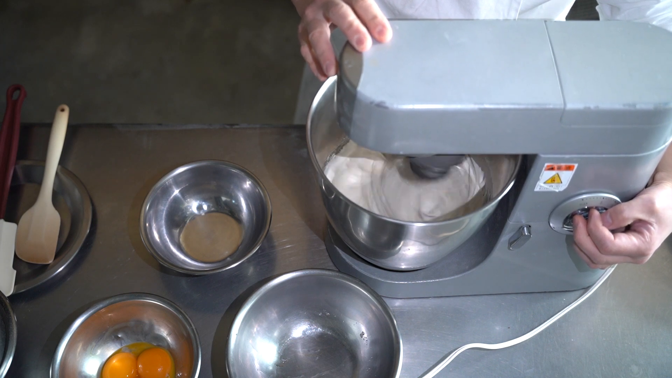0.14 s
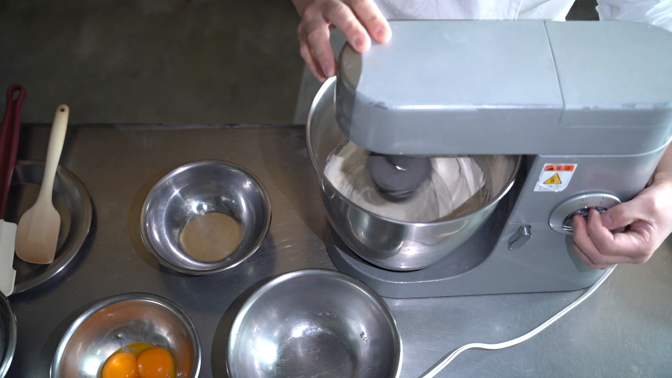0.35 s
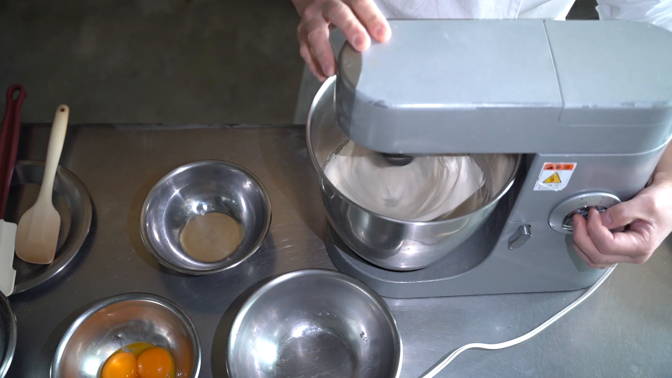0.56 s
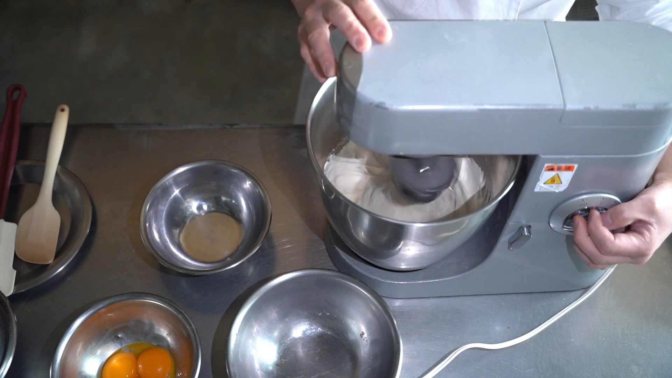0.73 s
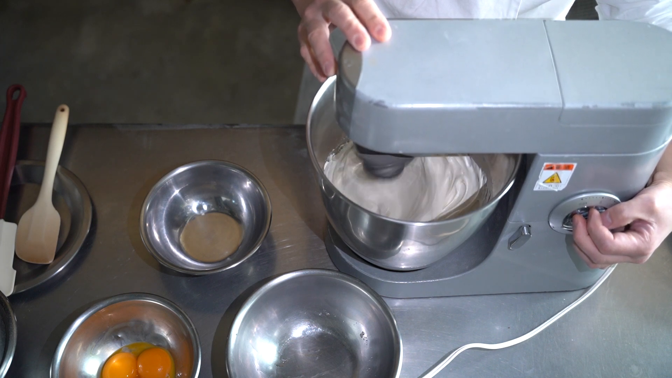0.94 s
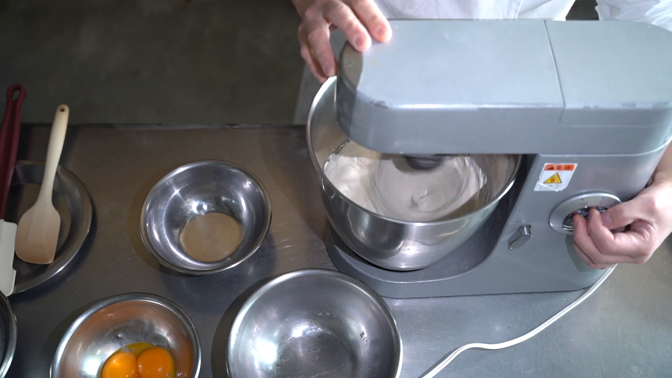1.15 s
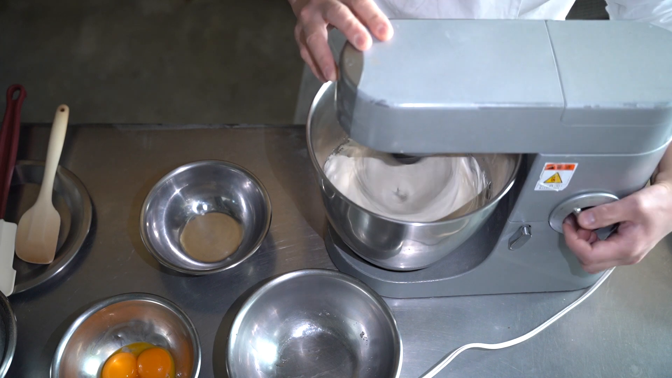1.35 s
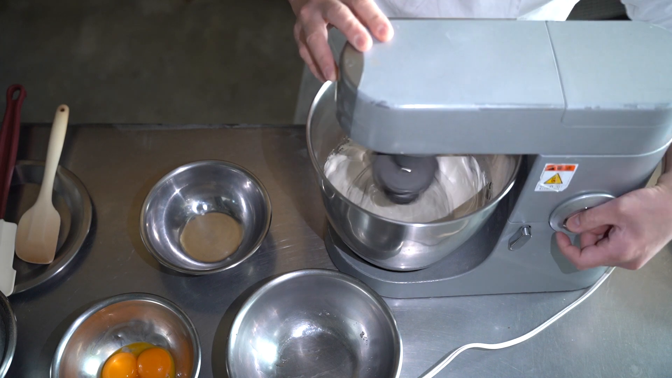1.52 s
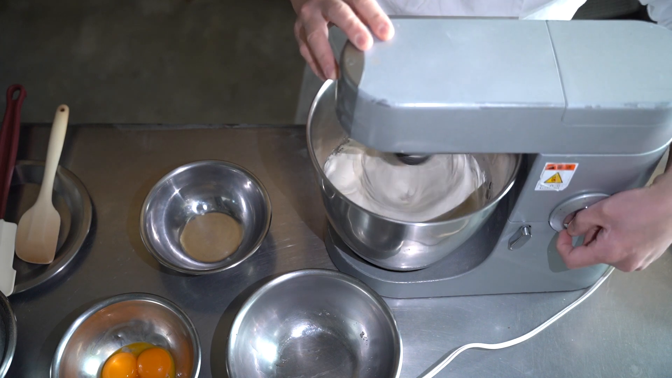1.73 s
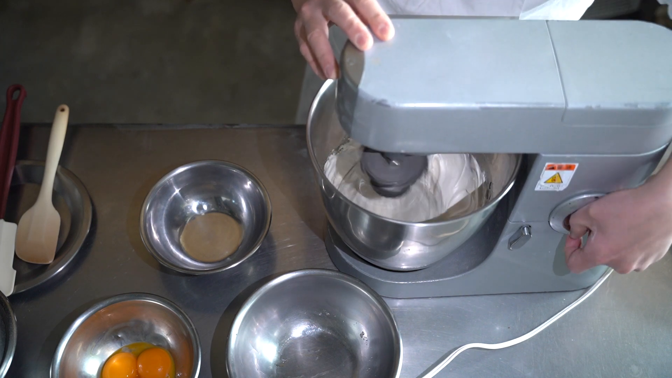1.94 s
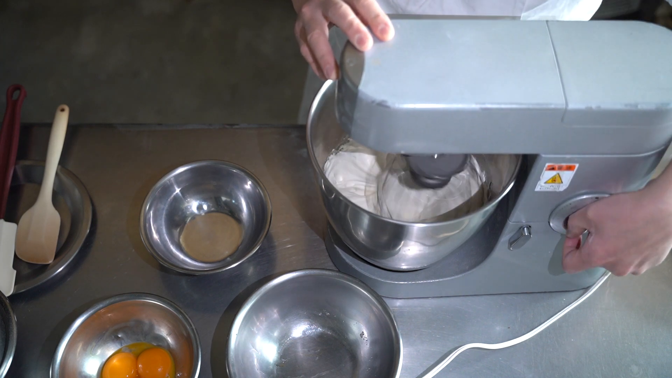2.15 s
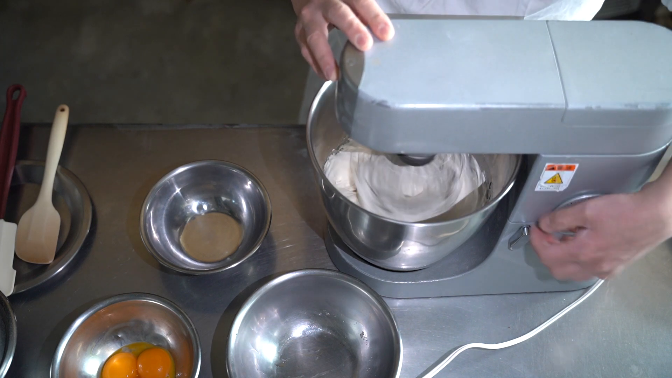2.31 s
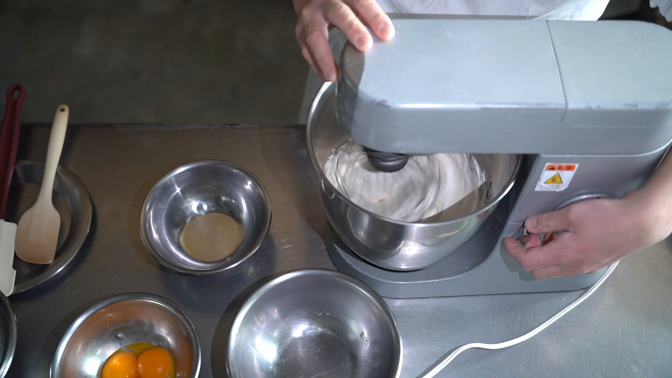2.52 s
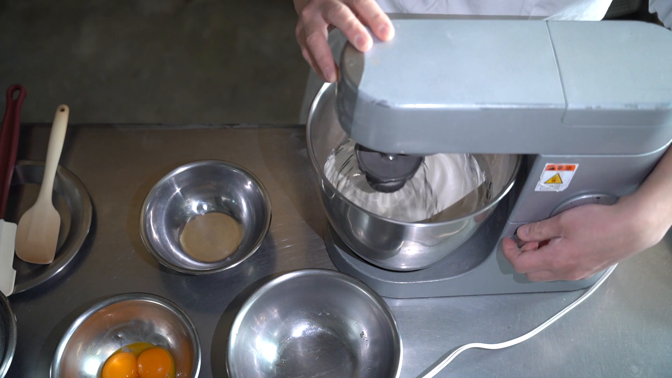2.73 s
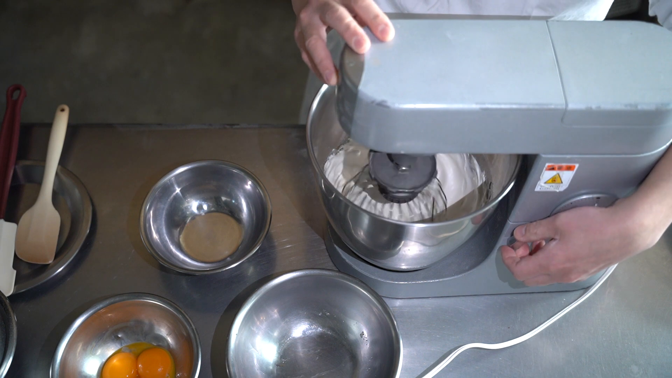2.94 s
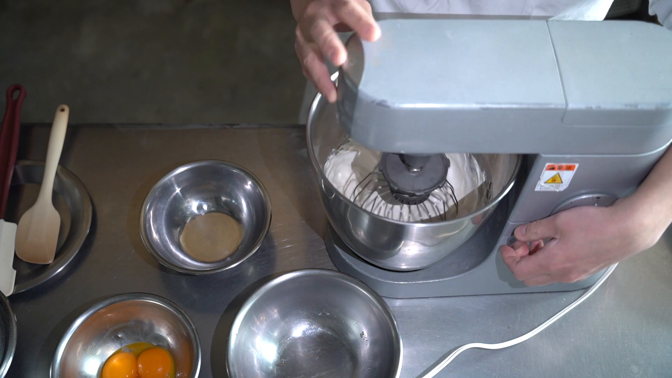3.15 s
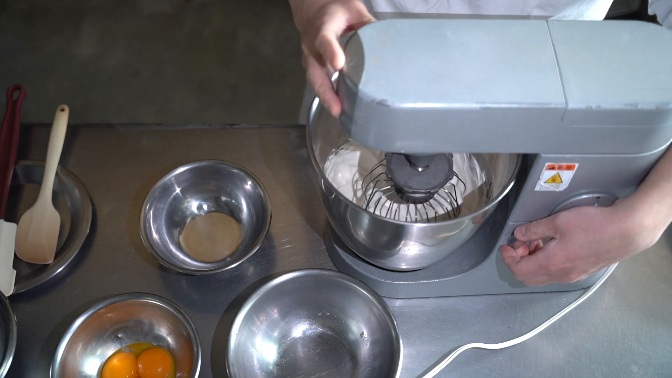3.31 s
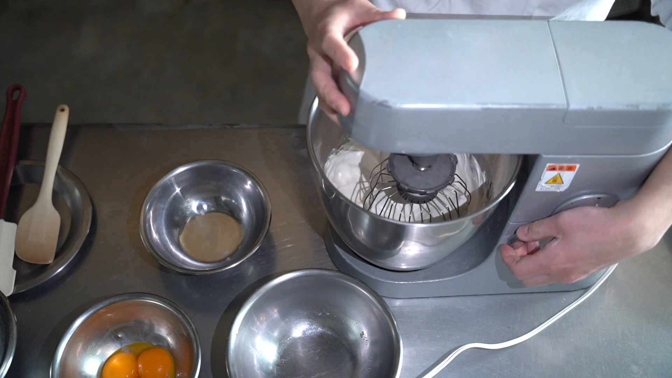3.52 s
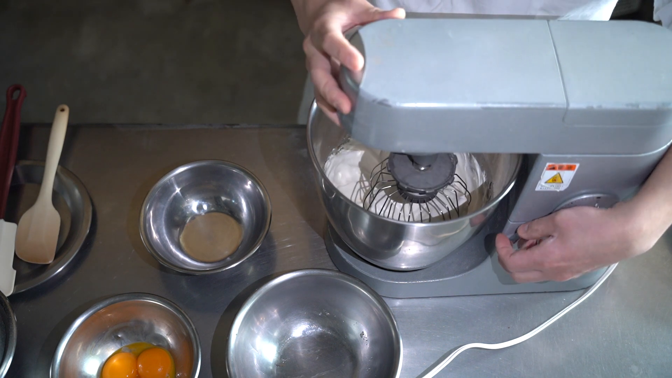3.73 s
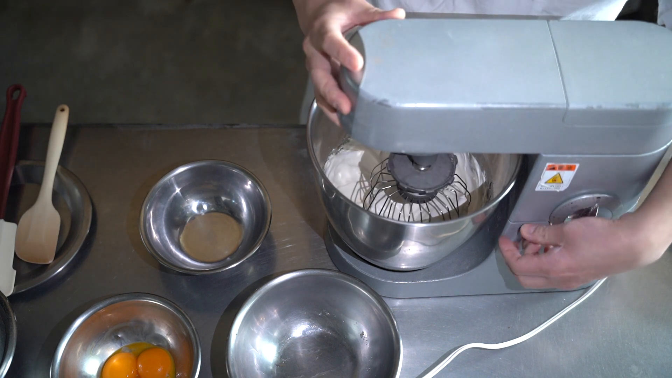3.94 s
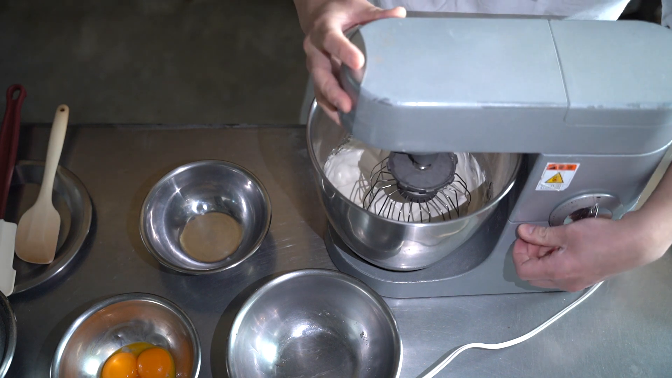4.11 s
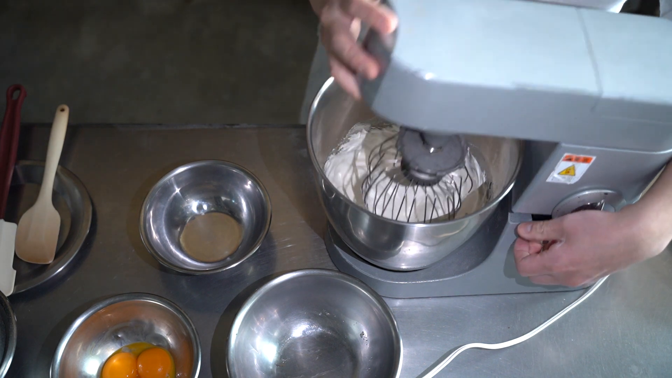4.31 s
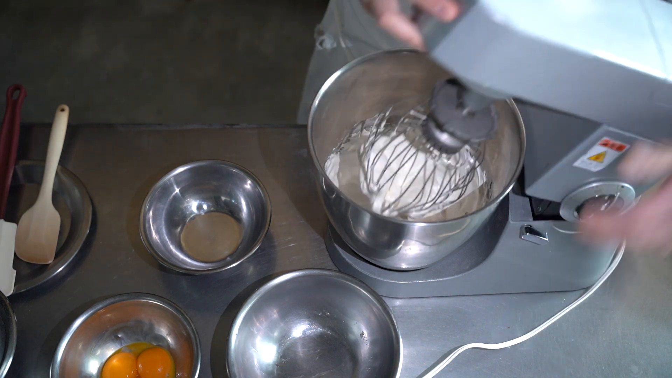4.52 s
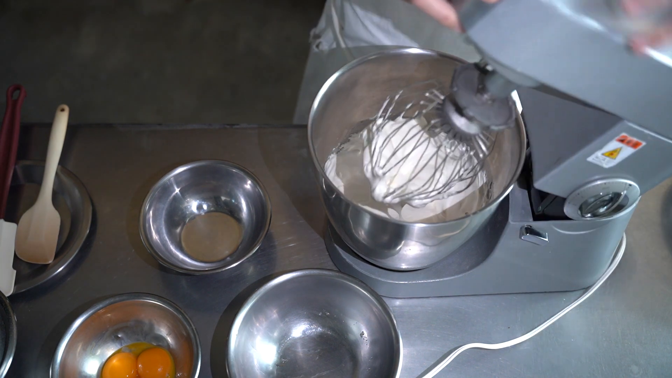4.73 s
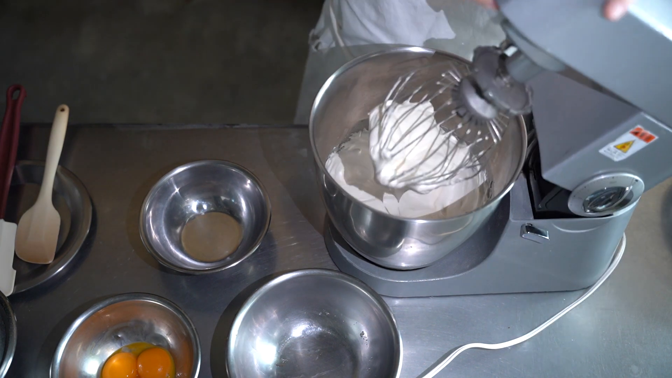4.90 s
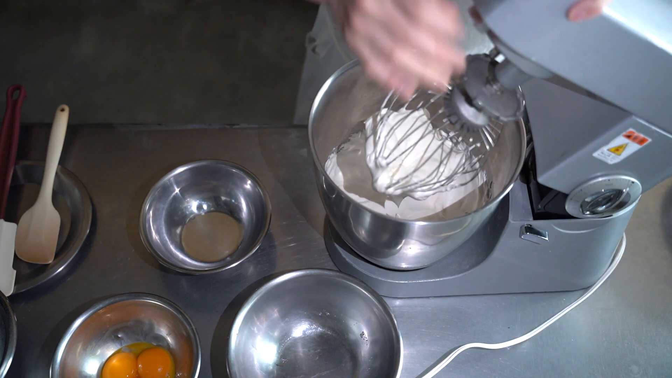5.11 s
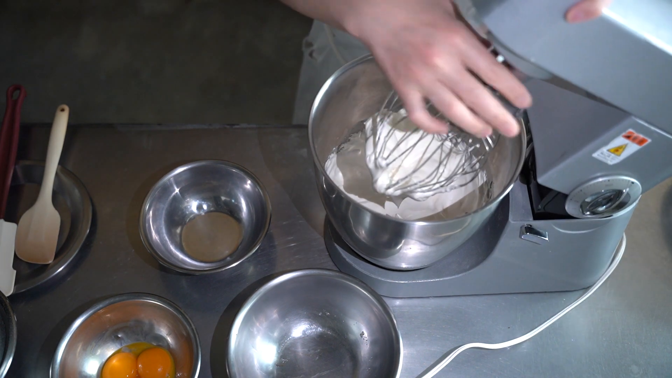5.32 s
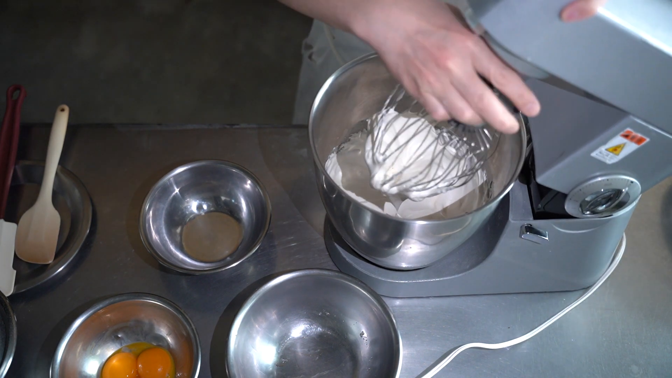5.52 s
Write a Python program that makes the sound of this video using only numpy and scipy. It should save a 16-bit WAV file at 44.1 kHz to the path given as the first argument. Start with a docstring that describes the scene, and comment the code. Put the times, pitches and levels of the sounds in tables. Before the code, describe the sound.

Close by and a little to the right, a stand mixer whips egg whites in a metal bowl with a steady motor whine and a hissing churn. A switch snaps and the motor slows, falling in pitch and fading with a light gear rattle. Then the head lock clacks several times, the hinge scrapes softly and the head clicks into its raised position. A cooling unit hums quietly in the kitchen behind it.

```python
"""A stand mixer whips egg whites in a steel bowl: meshing gears whine, wires churn and flick the foam.
Switched off, it coasts to rest against friction and drag, and the whine glides down through the
housing's fixed resonances. The head lock clacks open, the head swings up with a soft rub and clicks
into its upper stop, each impact ringing its modes. A cooling unit hums behind it in the kitchen."""
import sys
import numpy as np
from scipy import signal
from scipy.fft import rfft, irfft, next_fast_len
from scipy.io import wavfile
from scipy.ndimage import map_coordinates

SR = 44100
rng = np.random.default_rng(int(sys.argv[2]) if len(sys.argv) > 2 else 0)


def bounce(signal):
    """Save signal as a 16-bit WAV file at the path given by the first command-line argument."""
    frames = np.transpose(np.atleast_2d(signal))
    limited = np.clip(frames, -1, 1)
    pcm = np.round(limited * 32767).astype(np.int16)
    wavfile.write(sys.argv[1], SR, pcm)


N = 245195
TIME = np.arange(N) / SR
SWITCH_OFF_S = 1.425
RUN_HZ, CRAWL_HZ = 205.0, 47.7  # shaft rate under power; rate below which whisk and brushes die away

# spectrum of foam droplets striking the bowl: f/Hz, level/dB
SPRAY_SPECTRUM = [(4000, -20), (8000, 6.5), (11000, 1.5), (16000, -0.5)]


def amp(db):
    """Amplitude ratio of a level in decibels."""
    return 10 ** (np.asarray(db) / 20)


def unit(x):
    """Normalisation to rms 1."""
    return x / np.sqrt(np.mean(x ** 2) + 1e-20)


def along(points, hz):
    """Interpolation of (f/Hz, value) points on a logarithmic frequency axis."""
    f, v = np.transpose(points)
    return np.interp(np.log(hz + 1), np.log(f + 1), v)


def wobble(rate):
    """Smooth random modulation: a spline through `rate` Gaussian knots a second."""
    knots = rng.standard_normal(int(N * rate / SR) + 4)
    fine = np.arange(0, len(knots) - 1, 1 / 6)
    return np.interp(TIME * rate, fine, map_coordinates(knots, [fine]))


def filtered(x, response):
    """Linear filtering: the spectrum of x times a frequency response."""
    size = x.shape[-1]
    padded = next_fast_len(size + 8192)
    return irfft(rfft(x, padded) * response(np.fft.rfftfreq(padded, 1 / SR)), padded)[..., :size]


def noise(spectrum, size=N):
    """Stereo noise of rms 1, shaped by (f/Hz, level/dB) points; coherence falls with frequency."""
    # likeness of left and right: f/Hz, coherence
    coherence = [(200, 1), (380, 0.96), (700, 0.82), (1300, 0.59), (2300, 0.37), (4400, 0.067),
                 (9000, 0.033)]

    def mid_side_gains(hz):
        angle = np.arccos(np.clip(along(coherence, hz), -1, 1)) / 2
        return amp(along(spectrum, hz)) * [np.cos(angle), np.sin(angle)]

    mid, side = filtered(rng.standard_normal((2, size)), mid_side_gains)
    return unit(np.array([mid + side, mid - side]))


def tone(cycles):
    """A sinusoid of rms 1 with random initial phase."""
    phase = cycles + rng.random()
    return np.sqrt(2) * np.sin(2 * np.pi * (phase - np.floor(phase)).astype(np.float32))


def add(track, start_s, sound):
    """Superposition of a sound on a track."""
    part = track[:, round(start_s * SR):][:, :sound.shape[-1]]
    part += sound[..., :part.shape[-1]]


def strokes(rows, attack_s, release_s):
    """Sum of trapezoidal envelopes, one for each (t/s, duration/s, level/dB) row."""
    return sum(amp(db) * np.clip(np.minimum((TIME - s) / attack_s, (s + length - TIME) / release_s), 0, 1)
               for s, length, db in rows)


def to_the_right(x, share, lag_s=5e-5):
    """Localisation by level and time difference: the left channel is weaker and later."""
    # left minus right, before scaling by share: f/Hz, level/dB
    imbalance = [(150, -.1), (300, -1), (700, -1.5), (1300, -5), (2400, -6), (4400, -4.5), (8100, -8.5),
                 (15000, -8)]
    sides = np.array([[.5], [-.5]])
    lag = lambda hz: np.exp(-2j * np.pi * hz * lag_s * sides)
    return filtered(x, lambda hz: amp(share * along(imbalance, hz) * sides) * lag(hz))


def kitchen(x):
    """Reverberation: convolution with a diffuse, exponentially decaying tail that starts after 4 ms."""
    # reverberation time: f/Hz, t60/s
    decay_times = [(200, 0.14), (2000, 0.39), (6000, 0.29), (14000, 0.39)]
    hz, t, spectra = signal.stft(noise([(1000, 0)], size=SR // 2), SR, nperseg=256)
    tail = signal.istft(spectra * amp(-60 * t / along(decay_times, hz)[:, None]), SR, nperseg=256)[1]
    tail = np.pad(tail, ((0, 0), (SR // 250, 0)))
    return signal.fftconvolve(np.atleast_2d(x), tail / np.linalg.norm(tail[0]), axes=1)[:, :N]


def cooling_unit(fan_db=-49.0, drift_cycles=0.056):
    """Line spectrum over broadband fan noise; the strongest line is steadiest in phase."""
    # hum: f/Hz, level/dB
    hum_lines = [(215.3, -60.5), (279.9, -48), (323.0, -52.5), (355.3, -58.5), (409.1, -63), (780.6, -67.5)]
    # faint whistle: f/Hz, level/dB
    whistle_lines = [(3354, -77), (6702, -78)]
    # air through the fan: f/Hz, level/dB
    fan_spectrum = [(25, -38), (50, -23), (70, -6.5), (100, -9.5), (140, -2.5), (220, -2.5), (330, -5),
                    (430, -7.5), (750, -12.5), (1300, -18.5), (2500, -19.5), (4500, -29), (7500, -34.5),
                    (15800, -49.5)]
    top_db = max(db for hz, db in hum_lines)
    hum = sum(amp(db + 0.53 * wobble(4.02))
              * tone(hz * TIME + drift_cycles * (0.19 + (db < top_db)) * wobble(9))
              for hz, db in hum_lines)
    whistle = sum(amp(db) * tone(hz * TIME + 0.17 * wobble(50)) for hz, db in whistle_lines)
    return hum + whistle + amp(fan_db) * noise(fan_spectrum)


def rubbing(grain_db=2.0, squeak_hz=10050):
    """Sliding friction: the hinge scrapes and a hand slides over the painted head."""
    # hinge turning under the head's weight: t/s, duration/s, level/dB
    swings = [(4.05, 0.47, -62), (4.57, 0.38, -54), (5.28, 0.47, -66)]
    # hinge friction: f/Hz, level/dB
    hinge_spectrum = [(400, -1), (780, -12), (1100, 7), (1400, -6), (2000, -3), (2600, 3.5), (3200, -21),
                      (7000, -22), (12000, -38)]
    # hand movements: t/s, duration/s, level/dB
    slides = [(3.23, .13, -65), (3.36, 0.21, -69), (4.05, .1, -69), (4.58, 0.15, -66), (4.71, 0.32, -68.5),
              (4.86, 0.16, -76), (5.39, .15, -76)]
    # skin on paint: f/Hz, level/dB
    skin_spectrum = [(2000, -12), (6000, -3), (8500, -2), (10200, 0.5), (12000, -6), (16000, -6)]
    # thin squeak as the hand lets go: t/s, duration/s, level/dB
    letting_go = [(5.29, 0.16, -69)]
    hinge = strokes(swings, attack_s=0.022, release_s=0.18) * noise(hinge_spectrum)
    hand = strokes(slides, attack_s=0.047, release_s=0.057) * noise(skin_spectrum)
    squeak = strokes(letting_go, attack_s=.025, release_s=.14) * tone(squeak_hz * TIME + .25 * wobble(120))
    return amp(grain_db * wobble(77)) * (hinge + hand + squeak)


def impacts(contacts=3, flight_ratio=.85):
    """Inelastic rebound: each blow repeats, softer each time and after a shorter flight."""
    # blows in switch, lock and hinge: t/s, level/dB, low knock/dB, slope above 3 kHz/(dB/octave),
    # struck part's resonance f/Hz, first flight/s, loss per rebound/dB
    blows = [(1.626, -23, -5, 4, 4670, 0.0048, 10.5), (2.605, -42, -11, -8, 3560, .008, 14),
             (4.094, -42, -0.5, -1, 3420, 0.017, 13), (4.169, -39.5, 3, 0, 3720, 0.015, 13),
             (4.173, -34, -2, -12, 2050, .013, 10), (4.239, -39.5, 5.5, 2, 3760, 0.0065, 7),
             (4.341, -43.5, 1, -20, 2700, .007, 4), (4.445, -42, -14, -35, 3200, .012, 16),
             (4.723, -50, 0, -15, 2900, .008, 14), (5.0298, -32, -6, 0, 3440, .008, 3),
             (5.059, -39, -12, 5, 2500, .008, 18), (5.065, -32, 0, 6.5, 2450, .008, 11),
             (5.401, -47.5, -12, -11, 2350, .008, 14)]
    for s, db, knock_db, slope, part_hz, flight_s, loss_db in blows:
        for k in range(contacts):
            delay_s = flight_s * sum(flight_ratio ** j for j in range(k))
            yield s + delay_s, db - k * loss_db, knock_db, slope, part_hz


def clacks(ring_db=-16, body_t60=0.044, top_t60=0.022, part_db=7, room_db=-5):
    """Impact excitation: a noise burst coloured by the struck part, and the head's damped modes."""
    # modes of the mixer's head: f/Hz, level/dB, t60/s
    head_modes = [(774, -2, 0.077), (1040, -4, 0.16), (1092, 0, 0.15), (1288, -2, 0.098),
                  (1625, -11, 0.064), (1990, -11, 0.11), (2164, -2, 0.054), (2590, -1, 0.037),
                  (2880, -17, 0.07), (3080, -13, 0.049), (3380, -10, 0.05), (3600, -11, 0.06),
                  (4100, -14, .07)]
    # contact noise: f/Hz, level/dB
    burst_spectrum = [(120, -8), (400, -6), (620, 3), (800, -6), (1100, 8.5), (1400, 0.5), (1750, 1.5),
                      (2150, 7), (2900, -1.5), (4000, 3.5), (4800, -4.5), (6500, -5.5), (10000, -13.5),
                      (16000, -22)]
    out, t = np.zeros((2, N)), np.arange(SR // 5) / SR
    grid_hz = np.geomspace(100, 16000, 60)
    for s, db, knock_db, slope, part_hz in impacts():
        knock = knock_db * np.clip(np.log2(2000 / grid_hz) * 2, 0, 1)
        hardness = slope * np.maximum(np.log2(grid_hz / 3000), 0)
        resonance = part_db * np.exp(-(np.log2(grid_hz / part_hz) / .17) ** 2)
        colour_db = knock + hardness + resonance
        contact = np.column_stack([grid_hz, colour_db])
        ring = sum(amp(level + along(contact, hz) + rng.normal(0, 1.7, (2, 1)) - 60 * t / t60)
                   * tone(hz * t) for hz, level, t60 in head_modes)
        burst = noise(np.column_stack([grid_hz, colour_db + along(burst_spectrum, grid_hz)]), size=len(t))
        body = filtered(burst, lambda hz: 1 / (1 + (hz / 4500) ** 4))
        clack = amp(-60 * t / body_t60) * body + amp(-60 * t / top_t60 - 3.5) * (burst - body)
        add(out, s, amp(db + 2.0) * (amp(ring_db) * ring + clack))
    return out + amp(room_db) * kitchen(out)


def shaft_speed(power, wander_hz=0.35, sag_hz=5.5, friction_hz_per_s=83, drag_per_s=0.29):
    """Turns a second: nearly steady under power, then braked by dry friction and viscous foam drag."""
    coast_s = np.maximum(TIME - SWITCH_OFF_S, 0)
    brake_hz = friction_hz_per_s / drag_per_s
    start_hz = RUN_HZ + power * wander_hz * wobble(7) - (1 - power) * sag_hz
    return np.maximum((start_hz + brake_hz) * np.exp(-drag_per_s * coast_s) - brake_hz, 0)


def worktop(speed, level_db=-57.0):
    """Forced vibration: the turning planetary head shakes the worktop until it stops."""
    thrum = noise([(40, -32), (95, -24), (135, 7), (170, 34), (240, -23.5)])
    return amp(level_db) * np.minimum(speed / 100, 1) * thrum


def brushes(speed, half_speed_db=-54, fall_db=16):
    """Sliding contact: the motor brushes whir until the shaft stands still."""
    # brush friction: f/Hz, level/dB
    brush_spectrum = [(2500, -31), (3500, 7), (4400, -2), (5400, 4.5), (6100, -13), (9000, -27)]
    moving = np.sqrt(np.clip(speed / CRAWL_HZ, 0, 1))
    return moving * amp(half_speed_db - fall_db * (0.5 - speed / RUN_HZ)) * noise(brush_spectrum)


def backlash(speed, power, level_db=-39, fall_db=23, grain_db=6.0):
    """Random excitation of resonators: coasting teeth ring the gear case, more softly as they slow."""
    # modes of the gear case: f/Hz, bandwidth/Hz, level/dB
    case_modes = [(1073, 15, 0), (1683, 50, 2.5), (2060, 88, 0), (2084, 59, -8), (2520, 130, -6.5)]

    def case_response(hz):
        return sum((-1) ** k * amp(db) * 1j * hz * width / (mode_hz ** 2 - hz ** 2 + 1j * hz * width)
                   for k, (mode_hz, width, db) in enumerate(case_modes))

    knocks = amp(grain_db * wobble(140)) * noise([(600, -27.5), (1000, 3), (2600, -1), (3600, -20)])
    coasting = (1 - power) * np.minimum(speed / 30, 1)
    return coasting * amp(level_db + fall_db * (speed / RUN_HZ - 1)) * unit(filtered(knocks, case_response))


def flicks(t60=0.068, soft_per_s=9, soft_db=-38, scatter_db=2):
    """Impact transients: foam and wire tick on the bowl, with softer random ticks while under power."""
    # the hardest flicks: t/s, relative level/dB
    hard_flicks = [(0.0628, -28), (0.3556, -33), (0.6459, -32), (1.2979, -33), (1.8756, -32.5)]
    out, t = np.zeros((2, N)), np.arange(SR // 20) / SR
    draws = rng.random((round(soft_per_s * SWITCH_OFF_S), 2))
    soft_flicks = [(when * SWITCH_OFF_S, soft_db + scatter_db * (2 * force - 1)) for when, force in draws]
    for s, db in list(hard_flicks) + soft_flicks:
        add(out, s, amp(db - 6 - 60 * t / t60) * noise(SPRAY_SPECTRUM, size=len(t)))
    return out


def bowl(x, ripple_db=2.0, spacing_hz=22):
    """High modal density: the thin steel bowl's many close modes ripple the spectrum."""
    peaks = rng.standard_normal(2048)
    ripple = lambda hz: amp(ripple_db * map_coordinates(peaks, [hz / spacing_hz], mode="mirror"))
    return unit(filtered(x, ripple))


def whisk(speed, turns, power, rattle_db=-35.5, churn_db=-34, spray_db=-45, dull_hz=6300, dull_db=7):
    """Amplitude-modulated noise: wires churn in step with the shaft, the frame rattles, spray crackles."""
    # rattling frame: f/Hz, level/dB
    frame_spectrum = [(40, -37), (75, -20), (105, -18), (135, -6), (180, -11.5), (250, -7.5), (330, 2),
                      (430, -5), (620, -9.5), (780, -7.5), (930, -14), (1090, -4), (1300, -13), (2200, -46)]
    # wires in the foam: f/Hz, level/dB
    wire_spectrum = [(900, -12), (1400, 0.5), (1700, 6), (1880, 7.5), (2080, 14.5), (2450, 9), (2850, 3.5),
                     (3900, 0.5), (5500, 1), (6100, -2.5), (8500, -3), (9300, -8), (10200, -8),
                     (12500, -22)]
    pace = speed / RUN_HZ
    slowed = 1 - pace
    moving = np.sqrt(np.clip(speed / CRAWL_HZ, 0, 1))
    pulsing = 1 + 0.11 * (np.cos(4 * np.pi * turns) + 0.2 * np.cos(2 * np.pi * turns))
    rattle = amp(rattle_db - 17.5 * slowed) * noise(frame_spectrum)
    wires = bowl(noise(wire_spectrum))
    treble = filtered(wires, lambda hz: 1 - 1 / (1 + (hz / dull_hz) ** 8))
    wires = wires - (1 - amp(-dull_db * slowed ** 2)) * treble  # slower is duller
    churn = amp(churn_db - 21 * slowed + 0.47 * wobble(250) + 1.04 * wobble(20)) * pulsing * wires
    crackle = amp(3 * wobble(900) + 0.47 * wobble(49.2))
    spray = amp(spray_db) * pace ** 2.14 * unit(crackle * noise(SPRAY_SPECTRUM))
    chatter_band = noise([(1700, -49), (2000, -28), (2500, 11), (2850, -33)])
    chatter = amp(-48.5 + 3 * power) * pace ** 4 * chatter_band
    return moving * (rattle + churn + spray + chatter)


def drone(speed, turns, power, coast_db=-0.5, coast_below_hz=450):
    """Rotational tones of the lower shafts and frame; only the low ones persist with the current off."""
    # drone at full speed: f/Hz, level/dB
    drone_lines = [(129.2, -50.5), (323, -54), (376.8, -59), (532.9, -48.5), (592, -66), (753.7, -51),
                   (1093, -48.5), (1572, -53.5)]
    coasting = (1 - power) * amp(coast_db) * (speed / RUN_HZ) ** 2
    return sum((power + coasting * (hz < coast_below_hz)) * amp(db + 2.4 * wobble(8.24))
               * tone(hz * turns / RUN_HZ + 0.084 * wobble(14.9)) for hz, db in drone_lines)


def gears(speed, turns, power, flutter_db=1.8, jitter_cycles=0.018, orbit_db=3.0, fall_db=9):
    """Source and filter: harmonics of the shaft rate radiate through the housing's fixed resonances."""
    # shaft harmonics, 11 being the gear mesh: order, driven level/dB, coasting level/dB
    shaft_orders = [(1, -38.5, -42), (4, -44.5, -54), (8, -52.5, -65), (9, -60, -50), (10, -37, -44),
                    (11, -38.5, -35.5), (12, -34.5, -43), (13, -40.5, -48), (22, -53.5, -45.5),
                    (23, -44.5, -49), (24, -43, -68)]
    # radiation response of the housing: f/Hz, level/dB
    housing_response = [(60, -39), (105, -17), (132, -0.5), (165, -0.5), (205, 1), (500, -23), (800, -9),
                        (960, -12), (1080, -3), (1260, -12.5), (1420, -12), (1680, 0), (1880, -5.5),
                        (2050, 3), (2230, 2), (2480, -1), (2720, -7.5), (3000, -10), (4300, -9),
                        (5000, -10.5)]
    pace = speed / RUN_HZ
    orbit = np.cos(2 * np.pi * (turns - 39) / 68)  # the whisk circles the bowl once in 68 turns
    whine = np.zeros(N)
    for order, driven_db, coasting_db in shaft_orders:
        source_db = coasting_db + power * (driven_db - coasting_db) + fall_db * (pace - 1)
        radiated_db = source_db + along(housing_response, order * speed)
        wheel = 1 + .25 * tone(turns * 11 / 32)  # the driven wheel runs slightly off centre
        load = amp(orbit_db * orbit - 1) if order == 1 else wheel
        slack = (1 - power) * min(order / 11, 2)  # unloaded teeth chatter in their backlash
        slip = jitter_cycles * wobble(45) + order * .009 * wobble(12) + slack * .1 * wobble(110)
        gain = amp(radiated_db + flutter_db * wobble(15.46) + 2 * slack * wobble(60))
        whine += gain * load * tone(order * turns + slip)
    whine *= np.clip(4.9 * pace - 1, 0, 1)  # the mesh goes quiet at a crawl
    return whine + drone(speed, turns, power) + amp(-5) * kitchen(whine * (1 - .85 * power))


def scene():
    """Superposition of sources to the listener's right; one shaft drives the mixer's running sounds."""
    power = np.clip((SWITCH_OFF_S - TIME) / 0.016 + .5, 0, 1)
    speed = shaft_speed(power)
    turns = np.cumsum(speed) / SR
    mixer = gears(speed, turns, power) + whisk(speed, turns, power)
    mixer += backlash(speed, power) + brushes(speed) + worktop(speed)
    handling = clacks() + rubbing()
    return to_the_right(handling + cooling_unit(), share=0.75) + to_the_right(mixer + flicks(), share=0.94)


def record(dry):
    """Band limiting: an ideal low-pass at 15.9 kHz."""
    return filtered(dry, lambda hz: hz < 15900)


dry = scene()
out = record(dry)
bounce(out)
```